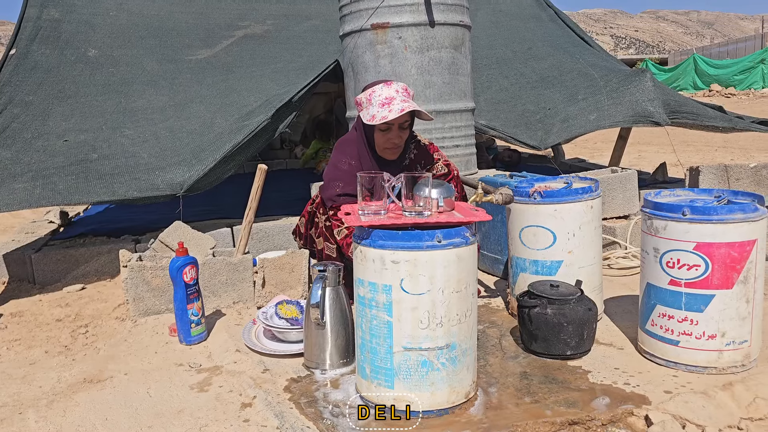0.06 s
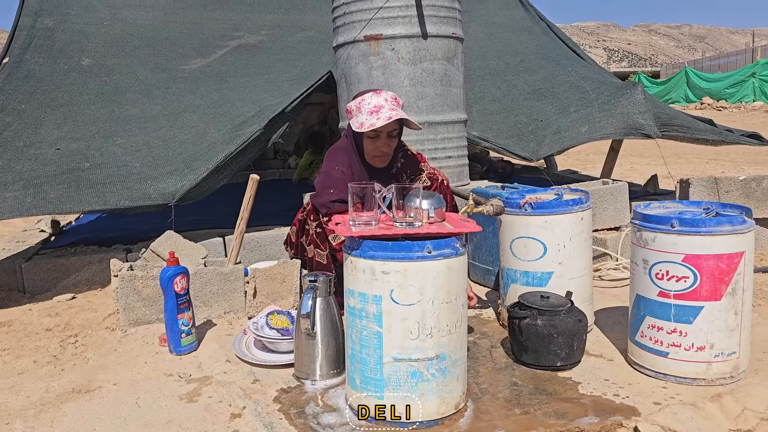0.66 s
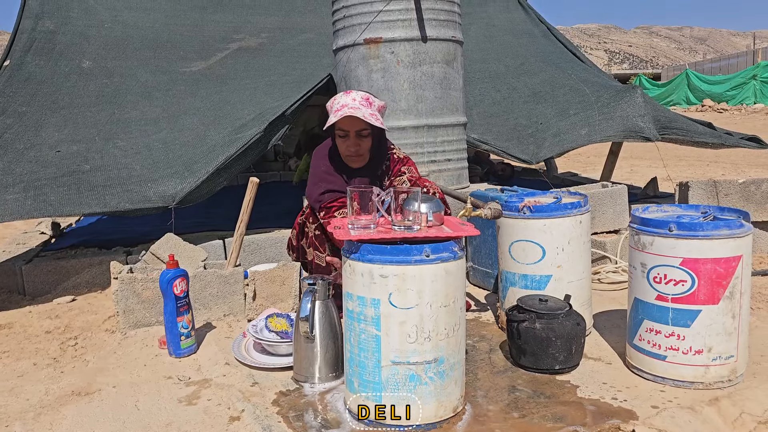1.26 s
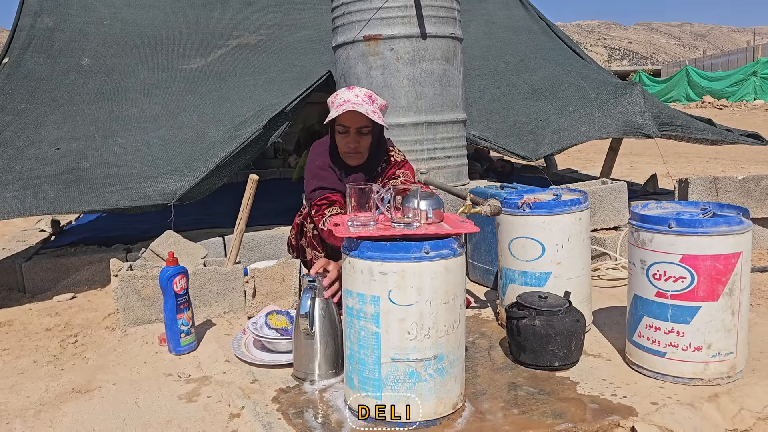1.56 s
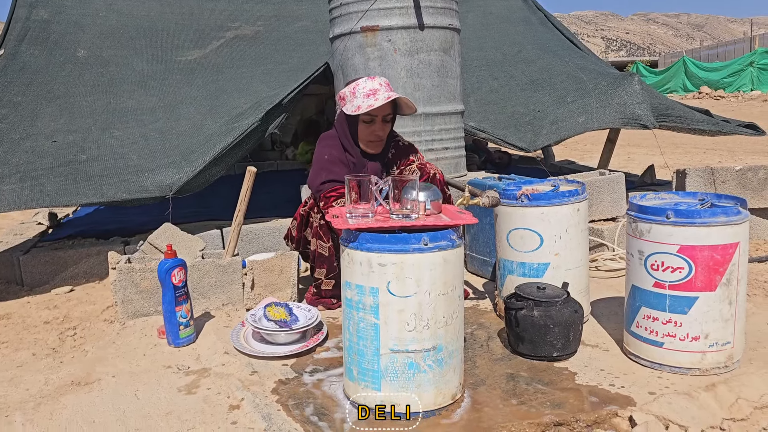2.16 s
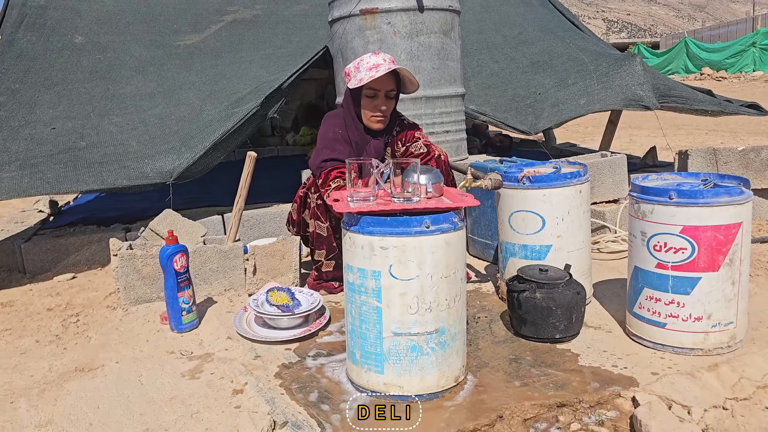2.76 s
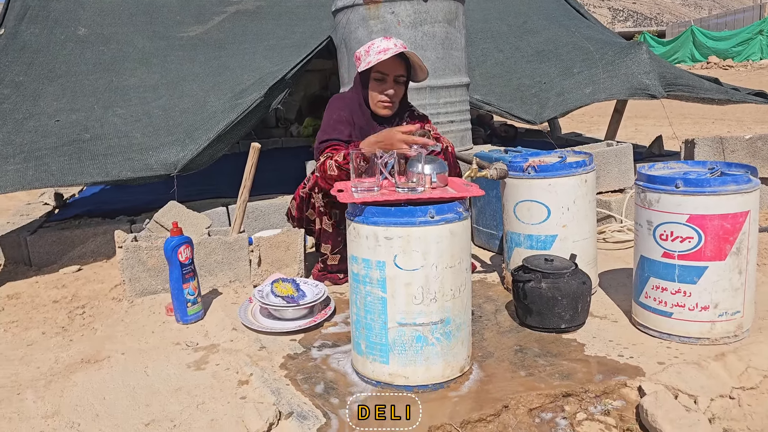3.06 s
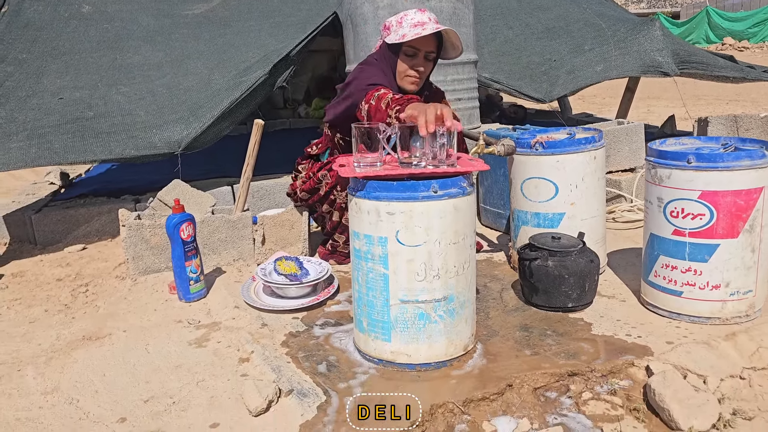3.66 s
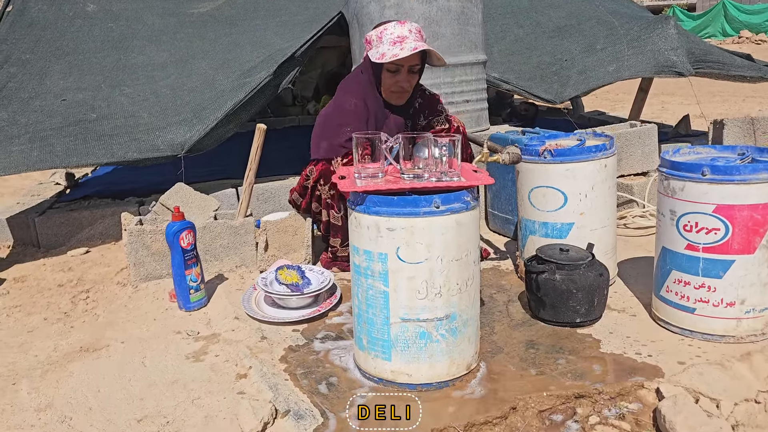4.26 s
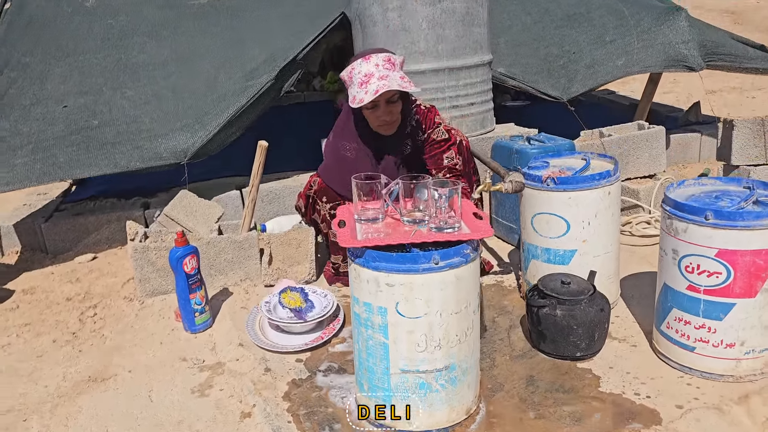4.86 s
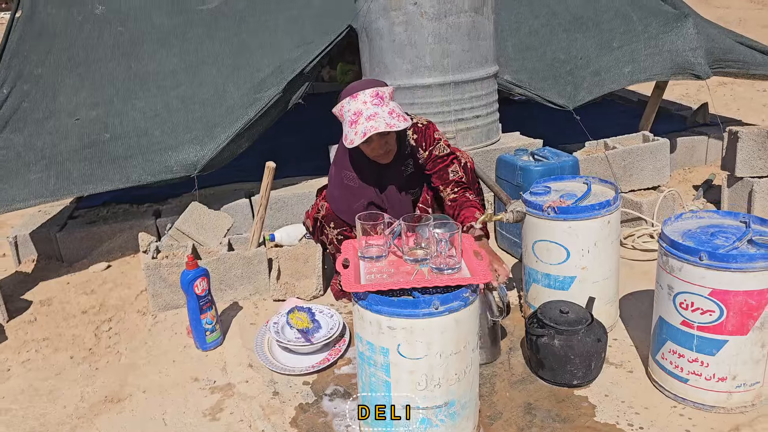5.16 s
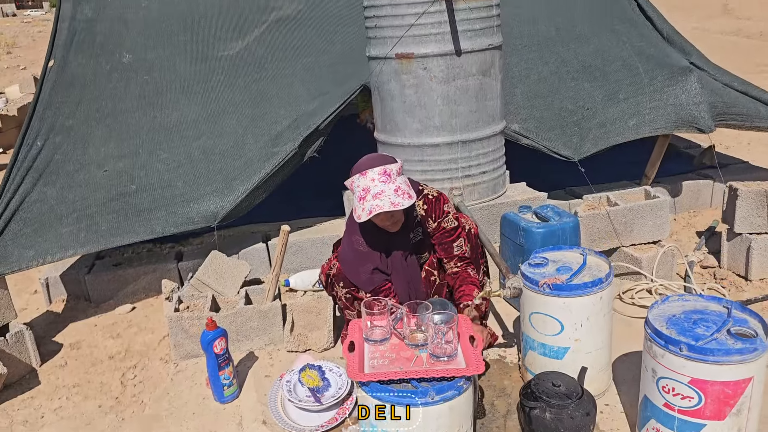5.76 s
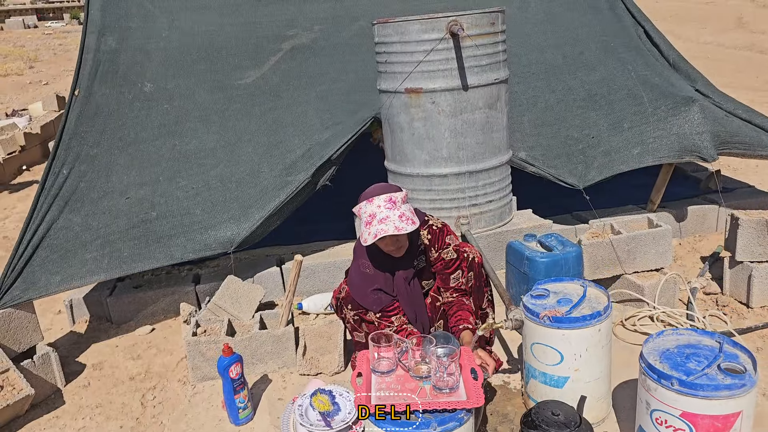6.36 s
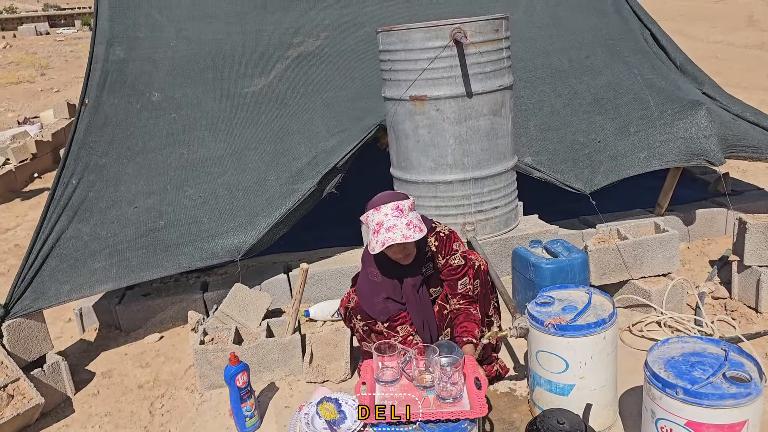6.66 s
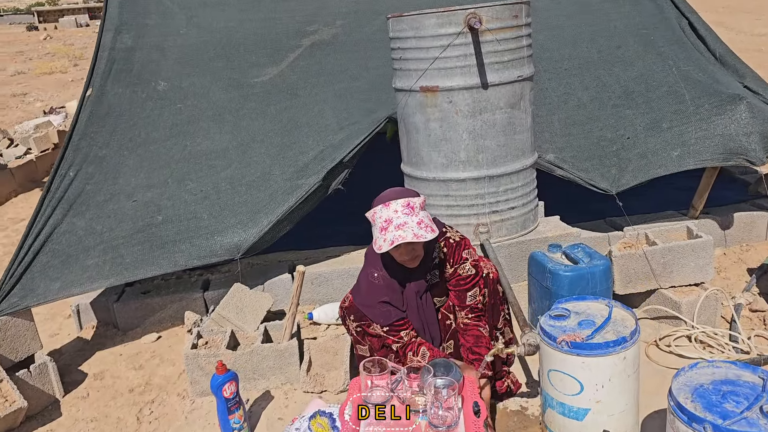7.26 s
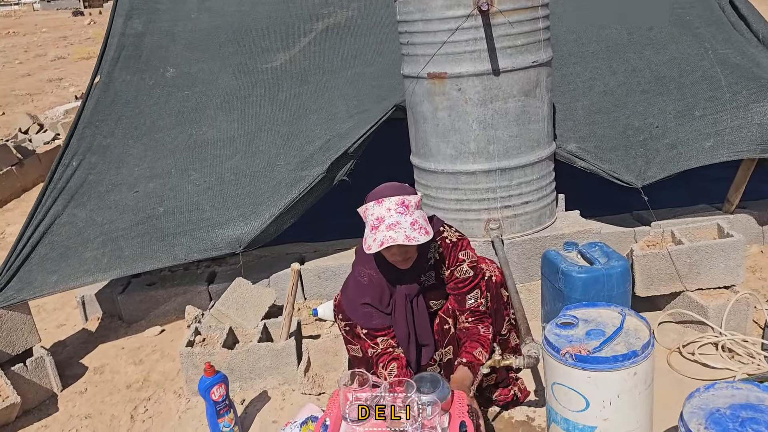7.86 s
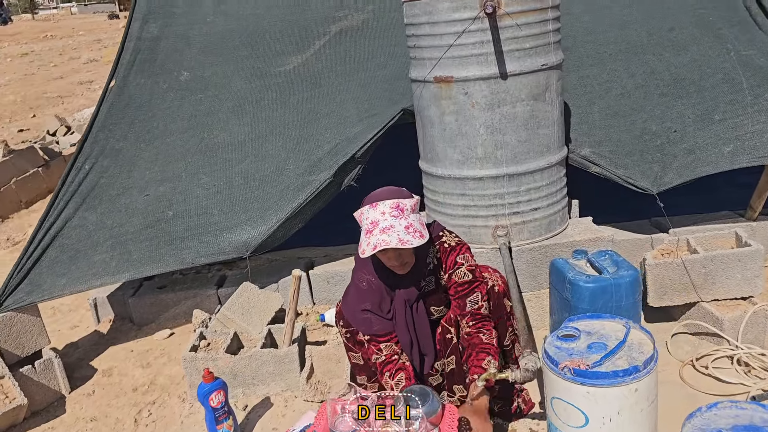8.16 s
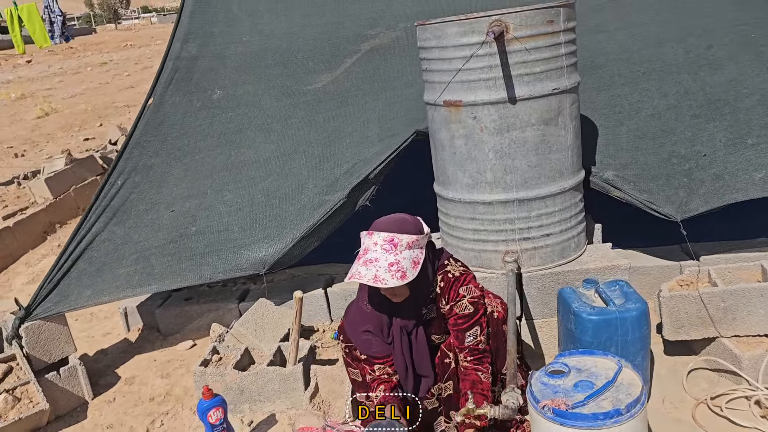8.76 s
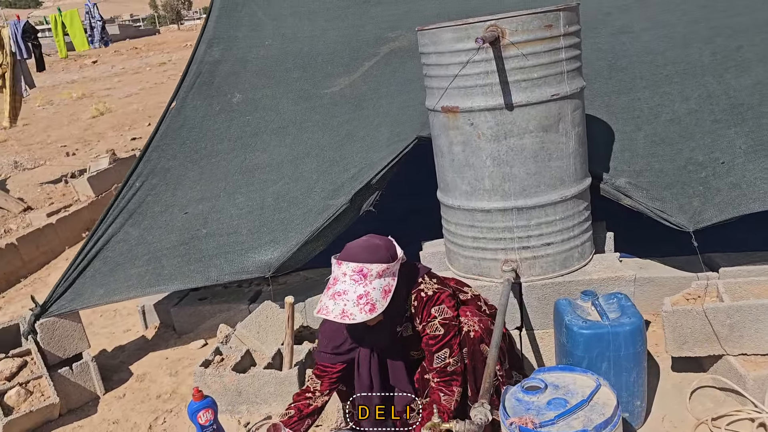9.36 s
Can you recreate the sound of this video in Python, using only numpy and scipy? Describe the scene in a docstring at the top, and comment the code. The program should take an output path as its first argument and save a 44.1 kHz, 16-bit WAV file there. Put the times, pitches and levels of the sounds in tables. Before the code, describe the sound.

Dishes are washed by hand outdoors, close by. Throughout, a thin stream of water patters in uneven spurts, hands slosh and rub wet dishes, and gusty wind rumbles low on the microphone. Drips and small gulps of air in a glass mark the first two seconds. From about 1.8 to 2.5 seconds a steel flask is dragged over the ground, juddering and ringing, with a short low groan near 3 seconds. Around 3.7 seconds a glass tumbler knocks and rings on a plastic tray. Washing continues with splashes, dull bumps and faint finger squeaks on glass. Glass rims snap together at about 6.3 and 6.7 seconds, then more softly near 7.7 and 8.7, among further knocks and drops. At about 9.4 seconds a metal bowl clinks brightly on a stack of plates.

```python
"""Wet fingers squeak on glass while a thin stream from an outdoor tank patters on hands and dishes.
Wind rumbles on the microphone throughout. Water sloshes, drips and gulps, and the dishes bump the tub.
A steel flask judders and groans as it is dragged over the ground, then a tumbler rings as it is set on
a plastic tray. Later, glass rims snap together, and at the end a metal bowl clinks on the plates."""
import sys
import numpy as np
from scipy import signal
from scipy.fft import rfft, irfft, next_fast_len
from scipy.io import wavfile
from scipy.ndimage import uniform_filter1d, map_coordinates

SR = 44100
rng = np.random.default_rng(int(sys.argv[2]) if len(sys.argv) > 2 else 0)


def store_pcm(level_fs):
    """Save levels as 16-bit WAV."""
    pcm = np.round(np.clip(level_fs, -1, 1) * 32767).astype(np.int16)
    wavfile.write(sys.argv[1], SR, np.atleast_2d(pcm).T)


N = 419817

# Levels are relative: each sound adds its own gain. t60 is the time taken to fade by 60 dB.
# finger squeaks, and the flask's low groan at 2.96 s:
# t/s, length/s, start f/Hz, middle f/Hz, end f/Hz, level/dB, overtone/dB, roughness
SQUEAKS = [(0, 0.064, 610, 557, 500, -36, -51, .15), (2.96, 0.24, 157.9, 147, 151.5, -38, -15, .05),
           (4.27, 0.038, 2820, 2660, 2620, -52, -22, .6), (4.362, 0.037, 2210, 1900, 1860, -49, -6, .35),
           (4.399, 0.026, 1990, 1890, 1880, -48.5, -1, .35), (5.496, 0.022, 920, 1040, 920, -57, 0, .4),
           (5.518, 0.024, 1050, 1280, 1300, -54, -4, 1), (5.541, 0.026, 1480, 1640, 1700, -49, -15, 1),
           (5.689, 0.012, 2500, 2610, 2660, -43.5, -16, .5), (7.616, 0.033, 1520, 1780, 1610, -57, -10, .8),
           (7.777, 0.013, 2850, 2740, 2550, -49, -14, .7), (8.025, 0.027, 1700, 1716, 1630, -54, -18, .8),
           (8.118, 0.012, 2820, 3090, 3220, -49, -22, .7), (8.126, 0.014, 1740, 1867, 1830, -48, -14, .7),
           (8.322, 0.016, 2500, 2260, 2300, -46, -16, .6)]
# the stream's steady patter: t/s, level/dB
STREAM_LEVELS = [(0, -60), (0.2, -68.5), (0.35, -65), (0.65, -63), (1.3, -61), (1.7, -76), (2.0, -53),
                 (2.6, -64), (3.15, -59), (3.5, -64), (3.9, -71.5), (4.35, -57), (4.85, -69), (5.45, -61),
                 (6.2, -69.5), (7.3, -64.5), (8.2, -68.5), (9.52, -63.5)]
# the stream breaks on a dish or a hand: crest t/s, length/s, level/dB
SPLASHES = [(0.068, 0.21, -58), (0.31, 0.17, -50.5), (0.578, 0.086, -54), (1.193, 0.031, -57),
            (1.295, 0.13, -53), (1.566, 0.37, -55.5), (1.82, 0.2, -49), (2.005, 0.087, -68),
            (2.566, 0.19, -51.5), (2.832, 0.28, -78), (2.933, 0.24, -49.5), (3.08, 0.26, -49),
            (3.999, 0.15, -57), (4.096, 0.14, -54), (4.686, 0.063, -40.5), (5.008, 0.096, -48),
            (5.096, 0.068, -52.5), (5.203, 0.049, -46.5), (5.487, 0.54, -55), (5.78, 0.17, -53.5),
            (6.063, 0.12, -54), (6.261, 0.06, -49.5), (6.737, 0.061, -40), (7.013, 0.1, -59),
            (7.451, 0.16, -57), (7.717, 0.27, -54), (8.112, 0.82, -58.5), (8.267, 0.082, -62),
            (8.585, 0.17, -52), (8.751, 0.088, -52), (8.92, 0.092, -52.5)]
# the breeze between gusts: t/s, level/dB
BREEZE_LEVELS = [(0, -44), (1.2, -37), (1.85, -44), (2.3, -35.5), (2.6, -42.5), (3.55, -37), (3.85, -45),
                 (4.1, -43), (5.6, -39), (5.95, -46.5), (6.5, -41), (7.3, -38.5), (8.3, -40.5),
                 (9.52, -40.5)]
# strong gusts: crest t/s, level/dB
GUSTS = [(0.52, -32), (0.77, -37), (1.608, -29.5), (2.25, -29.5), (3.39, -42), (4.1, -32), (4.452, -30.5),
         (4.738, -27.5), (5.14, -31.5), (5.76, -34.5), (6.79, -33.5), (7.16, -32), (7.389, -26.5),
         (7.6, -32), (7.992, -29), (8.52, -37.5), (9.51, -33)]
# how alike the wind is on the left and right: f/Hz, likeness (1 = the same)
WIND_LIKENESS = [(40, 0.99), (100, 0.58), (300, 0.38)]
# hands stroke a wet dish: crest t/s, length/s, slosh/dB, rub/dB
STROKES = [(0.062, 0.17, -61, -52), (0.292, 0.068, -81, -45), (0.572, 0.072, -59, -39.5),
           (1.178, 0.19, -77, -50.5), (1.34, 0.21, -68, -48.5), (1.56, 0.19, -54, -54),
           (1.807, 0.26, -57, -51.5), (2.604, 0.09, -57.5, -44), (3.084, 0.17, -50, -37),
           (3.184, 0.095, -48.5, -36.5), (3.34, 0.2, -56, -42.5), (3.552, 0.086, -60, -35.5),
           (4.356, 0.27, -58.5, -45.5), (4.451, 0.088, -75, -41), (4.753, 0.38, -55, -39),
           (5.022, 0.52, -60, -47), (5.41, 0.14, -56, -44), (5.722, 0.26, -49, -37),
           (6.089, 0.32, -58, -46.5), (6.357, 0.82, -67, -58), (6.686, 0.19, -45.5, -33),
           (6.793, 0.35, -58.5, -48), (7.0, 0.15, -55, -48), (7.46, 0.15, -56, -47.5),
           (7.708, 0.26, -56.5, -45.5), (7.776, 0.12, -69, -38), (7.967, 0.47, -56.5, -62),
           (8.088, 0.13, -60, -38), (8.248, 0.08, -41.5, -33.5), (8.399, 0.26, -65.5, -43.5),
           (8.611, 0.25, -52, -39.5), (8.77, 0.14, -57, -45.5), (8.934, 0.17, -68, -46.5),
           (9.143, 0.11, -87, -41), (9.383, 0.12, -46, -43), (9.51, 0.35, -49, -35.5)]
# tone colours of spray, wind, sloshing water, a hollow dish and the yard's hush: f/Hz, level/dB
PATTER_COLOUR = [(400, -4.5), (1000, -4.5), (2000, 1), (2600, -6), (4000, 4), (5000, -0.5), (6300, -6.5),
                 (7800, -2.5), (9500, -10), (11600, -3), (13000, -12), (15500, -20)]
WIND_COLOUR = [(11, -37), (18, -2.5), (49, 3), (101, 4.5), (193, -19), (247, -17.5), (285, -30), (400, -35),
               (520, -98), (880, -120)]
SLOSH_COLOUR = [(150, -2.5), (260, -6.5), (350, -4.5), (530, 10.5), (800, -9.5), (1200, -5), (2000, -18),
                (3500, -19), (8000, -79)]
HOLLOW_COLOUR = [(70, -49), (120, -1.5), (152, -2), (195, -5), (255, -4), (330, -19), (500, -27),
                 (1000, -59)]
HUSH_COLOUR = [(180, -40), (300, 4), (390, -18), (898, -20), (1150, -19), (4320, -18.5), (5900, -24),
               (11400, -35.5), (15000, -28.5)]
# drips into shallow water: t/s, f/Hz, level/dB
DRIPS = [(0.1638, 3650, -37), (0.311, 2310, -44), (0.323, 1470, -46), (0.3273, 2900, -39.5),
         (0.377, 4000, -44), (0.397, 2900, -35.5), (0.433, 3530, -43), (0.489, 4470, -46),
         (0.505, 3640, -38), (0.709, 4020, -39), (0.732, 4260, -41), (0.755, 4060, -43.5),
         (0.905, 2360, -51.5), (1.018, 2470, -46.5), (1.049, 3200, -47), (1.426, 1950, -50),
         (1.426, 4400, -36.5), (1.769, 2400, -45), (2.778, 4230, -39)]
# resonances of that pool: pitch and width (both as multiples of the drip's f), level/dB
POOL_MODES = [(.6, .12, -13), (1, .13, 0), (1.3, .15, -7), (2.1, .4, -22)]
# larger drops: t/s, level/dB, bubble f/Hz, spray/dB, lean (above 0 = left)
DROPS = [(0.458, -42, 2250, -51, 6), (0.558, -46, 2880, -55, -1), (1.142, -60, 4200, -59, 2),
         (1.747, -39.5, 3300, -69, -2), (2.0827, -60, 3300, -71, 1), (2.461, -35, 4880, -50, -9),
         (2.7665, -28, 4430, -46.5, -1), (2.826, -37, 4400, -45.5, -5), (2.905, -40.5, 4350, -54, -5),
         (2.943, -40, 3080, -45.5, -15), (3.042, -49, 2170, -54, 1), (3.087, -25, 3800, -71, -2),
         (3.431, -47.5, 4120, -61, -17), (4.09, -37, 4450, -66, -1.5), (4.246, -78, 2800, -53.5, -13),
         (4.6805, -35, 2540, -53, 0), (4.9087, -47.5, 5840, -60, 13.5), (4.9852, -38.5, 2660, -49.5, -2),
         (5.013, -43, 3260, -64, -1.0), (5.106, -39, 3960, -70, -5), (5.2004, -41, 5400, -64, -4),
         (5.4523, -42, 3970, -68, 0), (6.128, -48.5, 2520, -51.5, -8), (6.502, -46, 7400, -52, -8),
         (7.675, -53, 2010, -54, -4), (7.7256, -42, 3650, -55, 1), (7.75, -37.5, 3620, -55, -1.5),
         (8.235, -51, 2300, -48, -16), (8.417, -44, 7360, -53.5, -6), (8.4793, -36, 4050, -57, 4),
         (8.873, -56, 5130, -54, -13), (8.8896, -44, 2240, -44.5, -9), (8.9376, -56, 2550, -50.5, -12),
         (9.186, -50, 6840, -85, 13), (9.2232, -40, 5160, -54, 7.5), (9.2568, -58, 8000, -51, -2),
         (9.326, -42.5, 5240, -49, 6)]
# dishes bump the tub and tray: t/s, clack/dB, thud/dB, tub/dB, tray/dB, tick/dB, rattle t60/s
KNOCKS = [(0.5486, -54, -37.5, -56, -71, -68, 0.054), (1.536, -53, -55, -48, -46, -51, 0.024),
          (1.941, -64, -22, -46, -48, -73, 0.035), (1.995, -36, -28.5, -68, -33, -52.5, 0.084),
          (3.1835, -55, -40, -48, -39.5, -69, 0.045), (3.1959, -45, -38, -40.5, -66, -68, 0.15),
          (3.618, -27.5, -35.5, -48, -29.5, -55, 0.072), (3.641, -35.5, -34, -53, -23, -65, 0.066),
          (3.664, -36, -63, -55, -29, -71, 0.26), (3.696, -33, -36, -50.5, -37.5, -43, 0.12),
          (3.752, -59, -70, -60, -35.5, -85, 0.02), (3.829, -58, -80, -80, -57, -87, 0.024),
          (4.7344, -66, -39, -66, -69, -78, 0.11), (4.865, -46.5, -59, -69, -56, -82, 0.032),
          (5.0438, -48, -28.5, -61, -59, -74, 0.11), (5.74, -52, -45, -43.5, -58, -54, 0.079),
          (5.7831, -51, -44, -44.5, -37, -56, 0.064), (6.6517, -42, -37, -42, -47, -71, 0.15),
          (6.684, -47, -40, -39, -52, -71, 0.082), (6.702, -47, -23.5, -36, -46, -58, 0.027),
          (6.763, -62, -29, -51, -68, -58, 0.073), (6.9132, -56, -70, -44, -45.5, -72, 0.045),
          (7.316, -40.5, -38.5, -49, -45, -75, 0.033), (7.7012, -39.5, -33, -49.5, -64, -56, 0.035),
          (7.9063, -45.5, -32, -52, -61, -67, 0.041), (8.186, -49, -36, -48.5, -69, -74, 0.097),
          (8.25, -35.5, -26.5, -39.5, -51, -50, 0.21), (8.2747, -38, -51, -49, -47, -48, 0.036),
          (8.5844, -44, -25, -43.5, -75, -71, 0.08), (8.6096, -41, -35, -46, -68, -72, 0.048),
          (9.31, -71, -47, -47.5, -59, -57, 0.011)]
# air pockets in a glass: t/s, start f/Hz, level/dB, t60/s, roughness
GULPS = [(0.824, 772, -29, .06, .3), (1.273, 800, -36, .05, .7), (1.55, 1750, -41, .035, 1),
         (1.572, 906, -31, .035, .9), (1.612, 1020, -38, .03, 1), (1.645, 1300, -42, .025, 1),
         (1.659, 880, -37, .03, 1), (8.986, 1620, -45, .06, .5)]
# the flask is pulled over the ground: t/s, length/s, start level/dB, end level/dB
FLASK_PULLS = [(1.81, 0.14, -47, -43.5), (1.946, .015, -36, -38.5), (2.012, 0.078, -32, -39),
               (2.133, 0.041, -31.5, -33.5), (2.251, 0.17, -31, -31.5), (2.449, 0.042, -44, -38.5),
               (2.93, 0.23, -47.5, -60.5)]
# its base jerks free of the grit: t/s, level/dB
FLASK_JOLTS = [(1.942, -34), (1.997, -28), (2.145, -41), (2.196, -35.5), (2.242, -29), (2.322, -32),
               (2.365, -28), (2.393, -27.5), (2.424, -29), (2.500, -30.5)]
# its lid is jostled: t/s, level/dB
LID_TAPS = [(1.827, -46), (1.864, -55.5)]
# the tumbler touches down: t/s, level/dB, brightness/(dB per octave)
TUMBLER_TAPS = [(3.622, -46, -14), (3.6983, -38, 0)]
# glass rims meet: t/s, low ring/dB, bright ring/dB, pitch factor of the low ring
RIM_CLACKS = [(6.264, -25, -31, 1.06), (6.731, -27.5, -56, 1.24), (6.739, -32.5, -62, 1.55),
              (7.7015, -39, -55, 1.15), (8.680, -43, -57, 1.12), (8.773, -49, -58, 1.16)]
# blows on the plates: t/s, ring/dB, start f/Hz, settled f/Hz, clack/dB
PLATE_BLOWS = [(9.3555, -32.5, 674, 677, -60), (9.399, -25, 693, 606, -39), (9.484, -39, 700, 650, -43)]
# the bowl strikes the plates: t/s, level/dB
BOWL_TAPS = [(9.356, -37), (9.369, -36), (9.400, -57)]
# modes, the tones each object rings with when struck: f/Hz, level/dB, t60/s
FLASK_MODES = [(150, 3, .25), (235, 1, .1), (320, -3, .08), (396, 0, .24), (512, -6, .1), (610, -7, .06),
               (702, -4, .24), (770, -12, .18), (840, -12.5, .28), (985, -20, .2), (1310, -20, .12),
               (1718, -17.5, .22), (2005, -17, .16), (2260, -25, .1), (3280, -22, .12), (3880, -23, .1)]
LID_MODES = [(2035, -4, .14), (2708, -4, .12), (3150, -7, .1), (3876, -1, .14), (5518, -2, .08),
             (5819, -5, .12), (7900, -4, .1), (9900, -5, .1), (11746, -1, .1), (12600, -4, .08),
             (14583, -6, .08)]
TUMBLER_MODES = [(732, -13, .17), (829, -10, .22), (1626, 0.5, .26), (2417, -9.5, .34), (2842, 1, .29),
                 (3822, -11, .17), (3967, -24, .4), (5114, -25, .45)]
RIM_LOW_MODES = [(1380, 0, 0.015), (1950, -1, 0.022), (2270, -2, 0.01)]
RIM_BRIGHT_MODES = [(6200, -1.5, .012), (7340, 2.5, 0.028), (8450, 9, .012), (9750, 0, .01),
                    (10800, -5, .01)]
PLATE_MODES = [(975, -17, 0.17), (1790, -21, 0.12), (1980, -28, 0.4), (3120, -35, 0.16)]
BOWL_MODES = [(1980, -14, .15), (3680, -12, .1), (4280, -14, .1), (5600, -5, .09), (6005, 0, .11),
              (6210, -1, .11), (6712, -4, .1), (7540, -11, .06), (8500, -11, .05), (9660, -4, .06),
              (11464, 2, .07), (11600, -1, .05), (12550, -3, .04), (13230, -2, .04), (13700, -5, .04),
              (14300, -3, .04), (14665, -2, .06), (15228, -2, .05)]
# how long the yard echoes: f/Hz, t60/s
YARD_DECAY = [(200, 0.054), (2000, 0.095), (12000, 0.05)]
CONTACT_RISE_S = 0.0011  # a wet contact takes this long to build


def amp(db):
    """Decibels to gain."""
    return 10 ** (np.asarray(db) / 20)


def unit(x):
    """Scaled to rms 1."""
    return x / np.sqrt(np.mean(x ** 2) + 1e-20)


def along(points, hz):
    """(Hz, value) points on a log axis."""
    f, v = np.transpose(points)
    return np.interp(np.log(hz + 1), np.log(f + 1), v)


def curves(rows):
    """One value per sample for each column after the time."""
    s, *cols = np.transpose(rows)
    return [np.interp(np.arange(N) / SR, s, c) for c in cols]


def wobble(rate, size=N):
    """A smooth random curve, rate knots a second."""
    return map_coordinates(rng.standard_normal(int(size * rate / SR) + 4), [np.arange(size) * rate / SR])


def filtered(x, response):
    """x times a response of frequency."""
    n = x.shape[-1]
    m = next_fast_len(n + 8192)
    return irfft(rfft(x, m) * response(np.fft.rfftfreq(m, 1 / SR)), m)[..., :n]


def coloured(x, spectrum, size=4096):
    """x through a causal filter with the given (Hz, dB) points."""
    cepstrum = irfft(np.log(amp(along(spectrum, np.fft.rfftfreq(size, 1 / SR)))))
    cepstrum[1:size // 2] *= 2
    cepstrum[size // 2 + 1:] = 0
    return signal.fftconvolve(x, irfft(np.exp(rfft(cepstrum))))[:len(x)]


def add(track, s, sound):
    """Mix a sound into a track at time s."""
    part = track[..., max(0, round(s * SR)):][..., :sound.shape[-1]]
    part += sound[..., :part.shape[-1]]


def panned(x, pan_db):
    """Mono to stereo with a left-right level difference."""
    return x * amp([[pan_db / 2], [-pan_db / 2]])


def lagged(pair, lag_ms):
    """The left side hears the sound lag_ms later than the right."""
    return filtered(pair, lambda hz: np.exp(np.pi * 1j * hz * lag_ms / 1000 * np.array([[-1], [1]])))


def impacts(rate, spread_db):
    """Random tiny impulses of uneven size, rms 1."""
    sizes = amp(spread_db * np.clip(rng.standard_normal(N), -2, 2)) * np.sign(rng.standard_normal(N))
    return unit(sizes * (rng.random(N) < rate / SR))


def ring(modes, scatter_db):
    """One blow on a body: its modes at slightly new strengths."""
    t = np.arange(SR // 2) / SR
    return sum((-1) ** k * amp(db + scatter_db * rng.standard_normal() - 60 * t / t60)
               * np.sin(2 * np.pi * hz * t) for k, (hz, db, t60) in enumerate(modes))


def burst(t60, tail_db, tail_t60):
    """A sharp contact and its short, grainy tail, energy 1."""
    t = np.arange(SR // 6) / SR
    rattle = rng.standard_normal(len(t)) * amp(6 * wobble(600, size=len(t)) - 4)
    x = (rng.standard_normal(len(t)) * amp(-60 * t / t60)
         + rattle * amp(tail_db - 60 * t / tail_t60)) * (1 - np.exp(-t / CONTACT_RISE_S))
    return x / np.linalg.norm(x)


def bubbles(centre_hz, spread, cycles, rise, size_db, count=1500):
    """Small bubbles: damped tones that rise as they near the surface, rms 1."""
    t = np.arange(SR // 40) / SR
    start = rng.integers(0, N, (count, 1))
    pitch, size = np.clip(rng.standard_normal((2, count, 1)), -2, 2)
    hz = centre_hz * np.exp(spread * pitch)
    age = hz * t / cycles
    tone = amp(size_db * size) * np.exp(-age) * np.sin(2 * np.pi * hz * t * (1 + rise * np.minimum(age, 2)))
    return unit(np.bincount((start + np.arange(len(t))).ravel(), tone.ravel(), N)[:N])


def squeaks():
    """Surfaces stick and slip: wet fingers squeak on glass, and the dragged flask gives one low groan."""
    out = np.zeros(N)
    for s, length, start_hz, middle_hz, end_hz, db, overtone_db, rough in SQUEAKS:
        progress = np.linspace(0, 1, int(length * SR))
        jitter, rasp, flutter = (rough * wobble(rate, SR)[:len(progress)] for rate in (900, 1500, 285))
        glide_hz = np.polyval(np.polyfit([0, .5, 1], [start_hz, middle_hz, end_hz], 2), progress)
        phase = 2 * np.pi * np.cumsum(glide_hz * (1 + .105 * jitter)) / SR
        overtones = amp(overtone_db) * np.sin(2 * phase) + amp(2 * overtone_db - 8) * np.sin(3 * phase)
        tone = (np.sin(phase) + overtones) * (1 + amp(-16) * rasp)
        arch = np.abs(np.sin(np.pi * progress)) ** 0.27
        add(out, s, tone * arch * amp(db + 2 + 4.5 * flutter))
    return panned(out, pan_db=-0.5)


def swell(crest_s, length, rise):
    """A gain that climbs from -20 dB to 0 and back over length seconds; rise is the climbing share."""
    offset = (np.arange(N) / SR - crest_s) / length
    rise = np.clip(rise, .05, .95)
    return amp(-20 * np.minimum(np.maximum(-offset / rise, offset / (1 - rise)), 10))


def together(gains):
    """The joint gain of unrelated noises: their powers add."""
    return np.sqrt(sum(g * g for g in gains))


def fizz(patchy_db):
    """Fine spray: stereo noise in short patches of random pitch and strength."""
    noise = signal.stft(rng.standard_normal((2, N)), nperseg=256)[2]
    patches = uniform_filter1d(rng.standard_normal(noise.shape[1:]), size=22, axis=0)  # across pitch
    patches = uniform_filter1d(patches, size=7, axis=1)  # across time
    pair = signal.istft(noise * amp(patchy_db * unit(patches)), nperseg=256)[1][:, :N]
    return unit(np.array([coloured(x, PATTER_COLOUR) for x in pair]))


def stream():
    """The thin stream patters on hands and wet ground in spurts of splats, small bubbles and fizz."""
    steady_db, = curves(STREAM_LEVELS)
    splashes = [amp(db) * swell(s, length, rise=0.4) for s, length, db in SPLASHES]
    flow = together([amp(steady_db)] + splashes)
    spurt = amp(3 * wobble(28) + 2.8 * wobble(110) - 1)
    hits = np.array([unit(coloured(impacts(rate=130, spread_db=4), PATTER_COLOUR)) for _ in range(2)])
    tinkle = bubbles(centre_hz=3000, spread=.36, cycles=7.5, rise=.012, size_db=5.5, count=700)
    crackle = np.array([bubbles(centre_hz=7260, spread=.245, cycles=4.5, rise=.01, size_db=7, count=700)
                        for _ in range(2)])
    splat = burst(t60=.008, tail_db=-16, tail_t60=.04)
    splats = unit(signal.fftconvolve(hits, splat[None], axes=1)[:, :N])
    spray = amp(-4) * fizz(patchy_db=6) + amp(-7.5) * splats + amp(-15) * crackle
    return panned(flow * (spurt * spray + amp(-9) * tinkle), pan_db=-2)


def wind():
    """A gusty breeze swirls against the microphone and rumbles, a little more on the right."""
    breeze_db, = curves(BREEZE_LEVELS)
    gusts = [amp(db) * swell(s, length=0.25, rise=0.43) for s, db in GUSTS]
    strength = together([amp(breeze_db)] + gusts)
    # the rumble has a part both sides share and a part that is opposite on each side
    angle = lambda hz: np.arccos(np.clip(along(WIND_LIKENESS, hz), -1, 1)) / 2
    shares = lambda hz: amp(along(WIND_COLOUR, hz)) * [np.cos(angle(hz)), np.sin(angle(hz))]
    shared, opposite = filtered(rng.standard_normal((2, N)), shares)
    rumble = unit(np.array([shared + opposite, shared - opposite]))
    eddies = amp(2.5 * wobble(14) + 0.46)
    return panned(rumble * eddies * strength, pan_db=-3)


def hands():
    """With each stroke water sloshes round the hands, and rubbing sounds the hollow of the dish."""
    slosh_rest_db, rub_rest_db = -76, -58.5  # the hands never quite stop
    strokes = [(swell(s, length, rise=0.34), slosh_db, rub_db) for s, length, slosh_db, rub_db in STROKES]
    stirring = together([amp(slosh_rest_db)] + [shape * amp(db) for shape, db, _ in strokes])
    rubbing = together([amp(rub_rest_db)] + [shape * amp(db) for shape, _, db in strokes])
    churn = impacts(rate=350, spread_db=2.5) + 0.73 * rng.standard_normal(N)
    gurgle = amp(-10) * bubbles(centre_hz=750, spread=.3, cycles=3, rise=.03, size_db=4, count=500)
    slosh = unit(coloured(churn, SLOSH_COLOUR)) + gurgle
    rub = unit(coloured(impacts(rate=360, spread_db=6.5), HOLLOW_COLOUR))
    return panned(amp(1) * stirring * slosh + rubbing * rub, pan_db=0)


def hush():
    """The faint, even hush of the open yard."""
    return amp(-66.5) * np.array([unit(coloured(rng.standard_normal(N), HUSH_COLOUR)) for _ in range(2)])


def drips():
    """Each drip slaps shallow water: a tick coloured by the pool, then a little spray."""
    out = np.zeros(N)
    for s, hz, db in DRIPS:
        pool = lambda f: sum(
            amp(level) * 1j * f * width * hz / ((multiple * hz) ** 2 - f * f + 1j * f * width * hz)
            for multiple, width, level in POOL_MODES)
        tick = filtered(burst(t60=.011, tail_db=-15, tail_t60=.07), pool)
        add(out, s, amp(db + 13) * tick / np.linalg.norm(tick))
    return panned(out, pan_db=-3.5)


def drops():
    """Larger drops slap on wet surfaces, scatter spray and trap a small, unsteady bubble."""
    out, t = np.zeros((2, N)), np.arange(SR // 30) / SR
    for s, db, hz, spray_db, lean in DROPS:
        colour = [(300, db - 33), (1500, db - 30.5), (3600, db - 8.5),
                  (8000, spray_db - 2.5), (11500, spray_db - 5), (15000, spray_db - 11)]
        slap = np.array([coloured(burst(t60=.015, tail_db=-13.5, tail_t60=.1), colour) for _ in range(2)])
        envelope = amp(db - 4 - 60 * t / 0.018) * (1 - np.exp(-t / 0.00065))
        bubble = np.sin(2 * np.pi * hz * t * (1 + 5 * t) + .8 * wobble(1200, size=len(t)))
        add(out, s, panned(amp(30.5) * slap, pan_db=0.14 * lean))
        add(out, s, panned(envelope * bubble, pan_db=2 * lean))
    return out


def knocks():
    """Held dishes bump the tub and tray without ringing: a dull body, a short rattle, a bright tick."""
    out = np.zeros((2, N))
    for s, clack_db, thud_db, tub_db, tray_db, tick_db, rattle_t60 in KNOCKS:
        body_colour = [(60, thud_db - 10.5), (250, thud_db + 8.5), (360, tub_db + 5), (560, tub_db + 11),
                       (850, tray_db - 0.5), (1350, clack_db - 10.5), (2000, clack_db - 9),
                       (2800, clack_db - 17), (5000, clack_db - 22), (15000, clack_db - 54)]
        tick_colour = [(2000, tick_db - 45), (4500, tick_db - 23), (8000, tick_db),
                       (11000, tick_db - 7), (15000, tick_db - 16)]
        body = coloured(burst(t60=0.019, tail_db=-4.5, tail_t60=rattle_t60), body_colour)
        tick = [coloured(burst(t60=0.0033, tail_db=-23, tail_t60=0.057), tick_colour) for _ in range(2)]
        add(out, s, amp(36.5) * body + amp(29.5) * np.array(tick))
    return out


def gulps():
    """Air trapped in a glass rings briefly and rises in pitch, while the water round it spits."""
    out, t = np.zeros(N), np.arange(SR // 10) / SR
    spit_colour = [(400, -14), (900, 12), (1700, 5), (3200, -36), (6000, -43)]
    attack = 1 - np.exp(-t / 0.0039)
    for s, hz, db, t60, rough in GULPS:
        phase = 2 * np.pi * hz * t * (1 + 2.76 * t) + rough * wobble(450, size=len(t))
        tone = np.sin(phase) * amp(-60 * t / t60)
        spit = unit(coloured(rng.standard_normal(len(t)), spit_colour)) * amp(-27 - 60 * t / 0.22)
        add(out, s, amp(db) * attack * (tone + spit))
    return panned(out, pan_db=2)


def friction(grip_s=0.016, release_s=0.051):
    """How hard the flask scrapes: each pull grips quickly, grows or eases evenly and lets go."""
    t = np.arange(N) / SR
    return together(amp(np.interp(t, [s, s + length], [start_db, end_db]))
                    * np.interp(t, [s - grip_s, s, s + length, s + length + release_s], [0, 1, 1, 0])
                    for s, length, start_db, end_db in FLASK_PULLS)


def flask(stick_s=0.02, stick_db=-16, drone_hz=396):
    """The steel flask judders over sand: small slips ring its shell, and it sticks before each jolt."""
    pull = friction()
    jolts, stuck = np.zeros(N), np.zeros(N)
    for s, db in FLASK_JOLTS:
        add(jolts, s, amp([db + 18.5]))
        add(stuck, s - stick_s, np.ones(round(stick_s * SR)))
    judder = amp(stick_db * stuck + 3 * wobble(70) - 1)
    slips = pull * judder * unit(impacts(rate=900, spread_db=1.5) + .8 * rng.standard_normal(N))
    shell = ring(FLASK_MODES, scatter_db=1.5)
    ringing = signal.fftconvolve(slips + jolts, shell / np.linalg.norm(shell))[:N]
    jingle = lid()
    drone_gain = amp(-6 + 3 * wobble(35)) * pull  # friction keeps one tone of the shell singing
    drone = drone_gain * np.sin(2 * np.pi * drone_hz * np.arange(N) / SR + .4 * wobble(20))
    sand = coloured(amp(-10) * slips, [(40, -40), (150, 11), (400, 15), (850, 2), (1400, 1),
                                       (2100, -7), (3000, -21), (6000, -9), (14000, -17.5)])
    knock = coloured(amp(9) * jolts, [(40, -6), (150, 2), (600, 5), (1000, -3), (1600, -13),
                                      (2500, -23), (6000, -40), (14000, -55)])
    return panned(ringing + drone + sand + knock + jingle, pan_db=2)


def lid():
    """The flask's thin lid jingles and rasps as the flask is gripped."""
    out = np.zeros(N)
    rasp_colour = [(500, 2), (1400, 4), (4000, -15), (12000, 5), (15000, -4)]
    for s, db in LID_TAPS:
        scrape = burst(t60=0.02, tail_db=-2, tail_t60=0.14)
        add(out, s, amp(db) * signal.fftconvolve(scrape, ring(LID_MODES, scatter_db=1.5)))
        add(out, s, amp(db + 29) * coloured(burst(t60=0.02, tail_db=-3, tail_t60=0.12), rasp_colour))
    return out


def tumbler():
    """The glass tumbler rings as it meets the tray; the softer touch rings duller."""
    out, pivot_hz = np.zeros(N), TUMBLER_MODES[1][0]
    for s, db, brightness in TUMBLER_TAPS:
        modes = [(hz, level + brightness * np.log2(hz / pivot_hz), t60) for hz, level, t60 in TUMBLER_MODES]
        add(out, s, amp(db) * ring(modes, scatter_db=.5))
    return lagged(panned(out, pan_db=-3.5), lag_ms=0.0059)


def rims():
    """Wet glass rims snap together and chatter faintly; the hand quickly stops their ringing."""
    out, t = np.zeros((2, N)), np.arange(SR // 10) / SR
    attack = 1 - np.exp(-t / CONTACT_RISE_S)
    for s, low_db, bright_db, pitch in RIM_CLACKS:
        low_modes = [(hz * pitch, level, t60) for hz, level, t60 in RIM_LOW_MODES]
        for channel in out:
            contact = (t == 0) + amp(-36 - 60 * t / 0.052) * rng.standard_normal(len(t))
            low = amp(low_db) * ring(low_modes, scatter_db=2)
            bright = amp(bright_db) * ring(RIM_BRIGHT_MODES, scatter_db=3)
            add(channel, s, amp(1) * signal.fftconvolve(contact, (low + bright)[:len(t)] * attack))
    return panned(out, pan_db=-5.5)


def plates(sag_s=.008, low_t60=.125):
    """The stack of plates is knocked: a short clack, and a low ring that sags in pitch as they settle."""
    out, t = np.zeros(N), np.arange(SR // 2) / SR
    clack_colour = [(300, -20), (700, -17), (950, -8), (1180, 4), (1500, -30), (3000, -18), (9000, -22)]
    for s, db, start_hz, settled_hz, clack_db in PLATE_BLOWS:
        hz = settled_hz + (start_hz - settled_hz) * np.exp(-t / sag_s)
        low = np.sin(2 * np.pi * np.cumsum(hz) / SR) * amp(-60 * t / low_t60)
        clack = coloured(burst(t60=0.016, tail_db=-2, tail_t60=0.074), clack_colour)
        add(out, s, amp(db) * (low + ring(PLATE_MODES, scatter_db=-2)))
        add(out, s, amp(clack_db + 37) * clack)
    return lagged(out, lag_ms=-0.18)


def bowl():
    """The metal bowl clinks on the plates: a bright clash and a high ring."""
    out = np.zeros((2, N))
    clash_colour = [(300, 0), (2000, -1), (4500, -1), (6000, 18), (15000, 0)]
    for s, db in BOWL_TAPS:
        for channel in out:  # thin metal sends a different sound in each direction
            add(channel, s, amp(db - 5) * ring(BOWL_MODES, scatter_db=1.5))
            clash = coloured(burst(t60=0.026, tail_db=-11, tail_t60=0.22), clash_colour)
            add(channel, s, amp(db + 15.5) * clash)
    return panned(out, pan_db=-0.5)


def yard_echo(sound):
    """Barrels and ground scatter the sound back as a short echo."""
    hz, t, noise = signal.stft(rng.standard_normal((2, SR // 4)), SR, nperseg=256)
    tail = signal.istft(noise * amp(-60 * t / along(YARD_DECAY, hz)[:, None]), SR, nperseg=256)[1]
    delayed = np.pad(sound, (SR // 300, 0))
    return signal.fftconvolve(delayed[None], tail / np.linalg.norm(tail[0]), axes=1)[:, :N]


def scene():
    """The washing place lies slightly to the right, in the open air."""
    washing = stream() + hands() + drips() + drops() + knocks() + rims() + flask() + squeaks() + gulps()
    washing = lagged(washing, lag_ms=0.061) + tumbler() + bowl() + plates()
    return washing + amp(-9) * yard_echo(washing.mean(axis=0)) + wind() + hush()


def record(dry):
    """The sound starts and stops softly, and the very highest treble is cut off."""
    edges, top_hz = signal.windows.tukey(N, 512 / N), 16000
    return filtered(dry * edges, lambda hz: hz < top_hz)


dry = scene()
out = record(dry)
store_pcm(out)
```